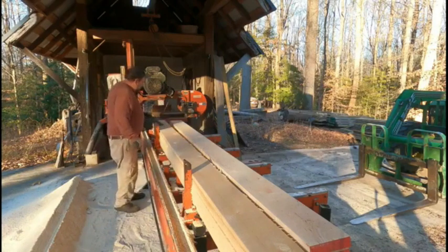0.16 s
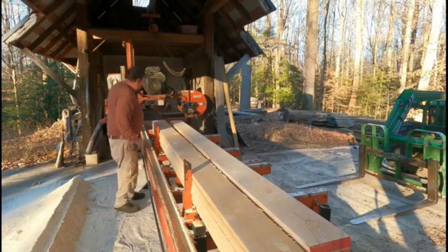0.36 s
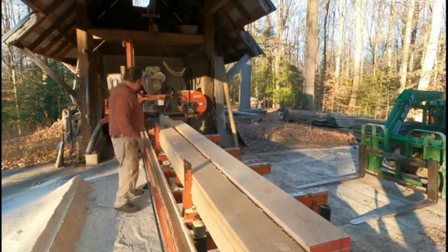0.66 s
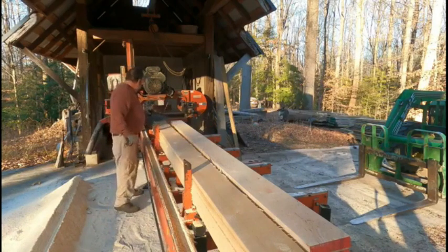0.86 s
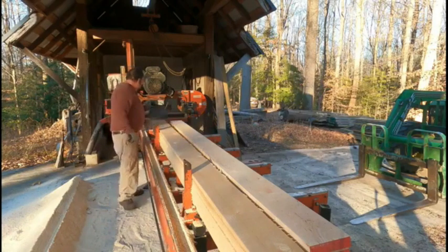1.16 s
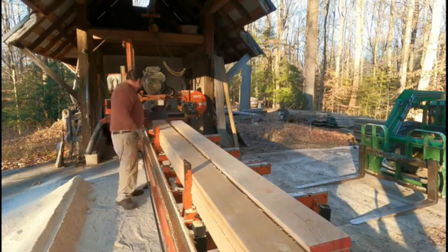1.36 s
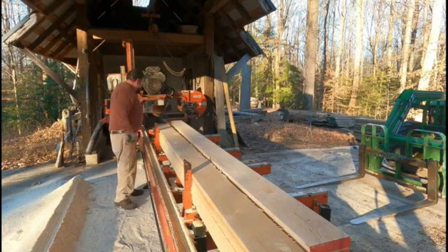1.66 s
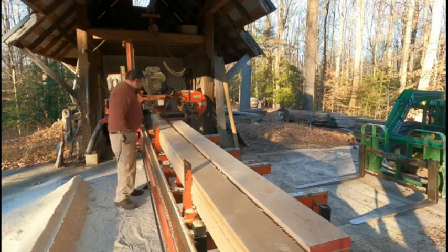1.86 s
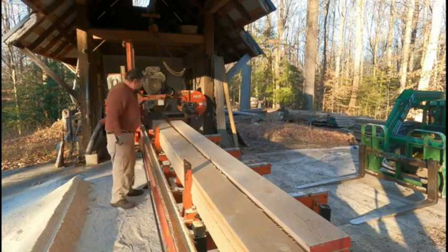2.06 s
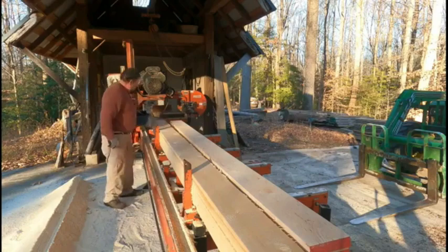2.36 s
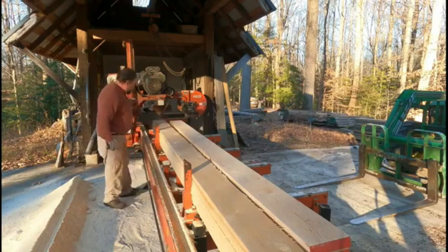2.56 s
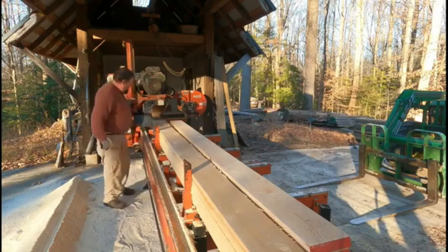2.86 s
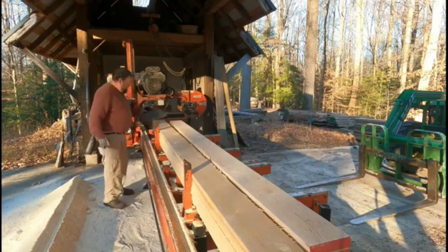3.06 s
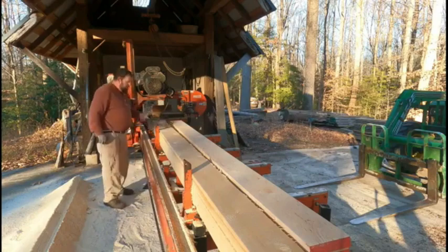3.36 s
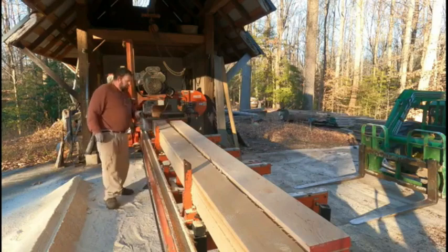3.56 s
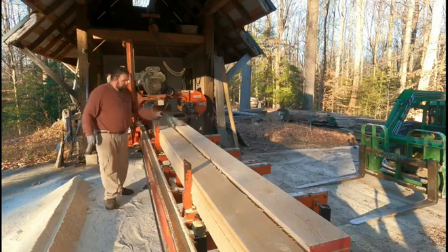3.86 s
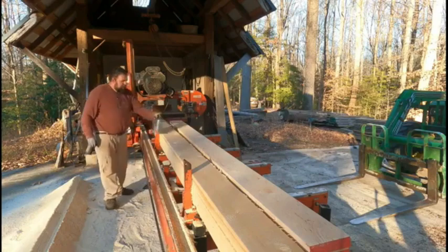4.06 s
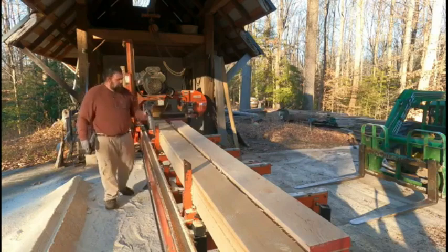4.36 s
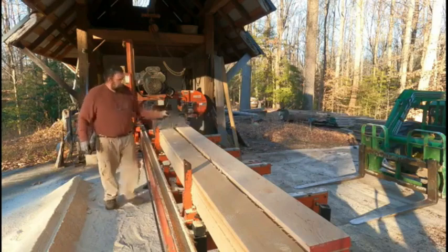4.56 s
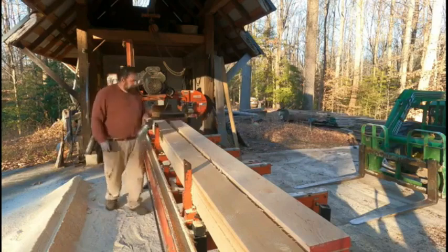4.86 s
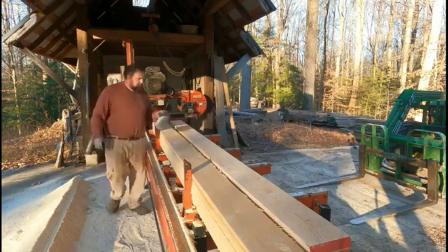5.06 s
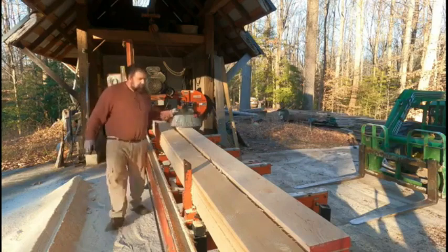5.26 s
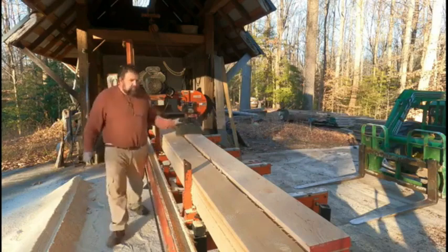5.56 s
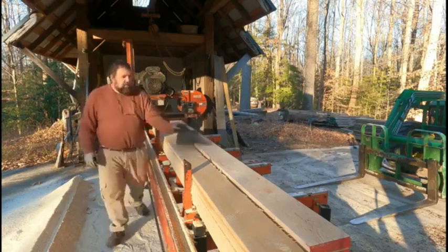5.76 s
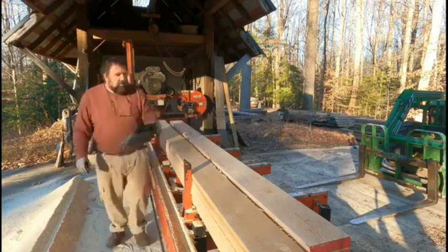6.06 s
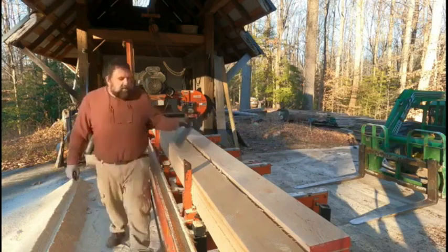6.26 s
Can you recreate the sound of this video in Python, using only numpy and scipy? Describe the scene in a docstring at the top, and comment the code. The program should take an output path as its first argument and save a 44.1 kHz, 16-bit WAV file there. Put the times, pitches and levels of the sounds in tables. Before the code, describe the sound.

A hand brush sweeps sawdust off a wooden board in short, scratchy strokes, with faint shoe scuffs over a low outdoor rumble.

```python
"""Over the low rumble of an open-air sawmill, a man hand-brushes sawdust off a freshly sawn board.
From 0.14 s, nine strokes: each slaps down, then the bristles hiss along the wood as it rings under them.
Meanwhile his shoes scuff in the sawdust and the mill shed answers faintly. From 4.5 s a few chips snap;
at 5.2 s the wood squeaks. The last, longest stroke lifts at 6 s, followed by a scuff and a snap."""
import sys
import numpy as np
from scipy import signal
from scipy.io import wavfile

SR = 44100
rng = np.random.default_rng(int(sys.argv[2]) if len(sys.argv) > 2 else 0)


def digitize_waveform(pressure):
    """Quantize a signal to 16-bit integers and store it at the path in sys.argv[1].

    Rows of a 2-D input are taken as channels; values are limited to [-1, 1].
    """
    field = np.atleast_2d(pressure).T
    bounded = np.clip(field, -1, 1)
    quanta = np.round(bounded * 32767).astype(np.int16)
    wavfile.write(sys.argv[1], SR, quanta)


N = 281799

# brush strokes: start/s, lift-off/s, hiss/dB, ring/dB, build-up exponent, release/(dB/s)
BRUSH_STROKES = [(.137, 0.337, -47.5, -49, 2.05, 333), (0.743, 1.033, -43.5, -43, 1.52, 284),
                 (1.594, 1.877, -48.5, -47.5, 1.22, 340), (2.226, 2.451, -47, -48.5, 1.7, 357),
                 (2.758, 2.957, -50.5, -49.5, 2.1, 239), (3.271, 3.549, -49, -47.5, 0.97, 334),
                 (3.962, 4.196, -45.5, -45.5, 0.93, 214), (4.757, 4.939, -45, -44.5, 1.08, 266),
                 (5.455, 5.993, -44.5, -49.5, 1.25, 430)]
# hand bears down: t/s, half length/s, rasp/dB, pitch factor, fizz/dB
HAND_PRESSES = [(1.807, 0.018, -46, 1.45, -74), (2.296, 0.049, -46.5, 1.08, -83),
                (3.469, 0.037, -40, 1.27, -76), (4.889, 0.036, -37, 0.98, -65),
                (5.937, 0.054, -44.5, 1.56, -53)]
# brush lands: t/s, ring/dB, knock/dB, crack/dB, crack f/Hz, tick/dB, t60/s
BRUSH_SLAPS = [(0.137, -44, -55.5, -44, 2100, -53, 0.32), (0.747, -50, -69, -56, 1940, -69, 0.27),
               (1.582, -31.5, -49, -41, 2190, -58, 0.22), (2.228, -37.5, -53.5, -38, 2080, -48.5, 0.13),
               (2.758, -42, -54, -44.5, 1880, -53, 0.28), (3.275, -39, -56, -39.5, 1480, -62, 0.18),
               (3.968, -45, -46, -43, 1360, -57, 0.25), (4.693, -40, -41.5, -39.5, 1660, -47, 0.21),
               (4.807, -35, -47, -39, 1530, -62, 0.38), (5.473, -44, -46.5, -48, 1590, -56.5, 0.21)]
# board bumps the mill bed: t/s, level/dB, t60/s
BOARD_THUDS = [(0.169, -49, 0.4), (1.637, -54.5, 0.36), (2.274, -52.5, 0.4), (4.175, -62, 0.42),
               (4.906, -50, 0.15), (5.571, -58.5, 0.19)]
# shoe drags: peak t/s, rise/s, fall/s, sole/dB, rustle/dB, grit/dB
SHOE_SCUFFS = [(.2, 0.041, 0.041, -62.5, -66, -76), (.68, .012, .04, -72, -78, -74),
               (1.331, 0.13, 0.07, -61, -50.5, -67), (2.29, 0.047, 0.059, -49.5, -48, -74),
               (3.335, 0.047, 0.034, -60, -63, -72), (3.55, 0.075, 0.14, -68, -70.5, -69),
               (4.19, 0.02, 0.099, -56, -60.5, -62), (4.63, 0.072, 0.084, -65.5, -63, -62),
               (4.83, 0.047, 0.16, -56, -76, -70), (5.06, 0.067, 0.11, -76.5, -68.5, -76),
               (5.33, 0.13, 0.12, -75, -82, -80), (5.97, 0.22, 0.076, -62, -56, -88),
               (6.135, 0.092, 0.091, -59.5, -60, -67)]
# chips break: t/s, level/dB, t60/s
CHIP_SNAPS = [(4.550, -71, .1), (4.625, -63, .1), (5.032, -56, .06), (6.108, -51, .03)]
# arm swings: t/s, level/dB, half length/s
ARM_SWISHES = [(0.117, -73.5, 0.1), (0.73, -78, 0.025), (1.56, -66.5, 0.13), (2.2, -68.5, 0.069),
               (2.76, -71, 0.027), (6.37, -73, 0.076)]
# rumble contour: t/s, level/dB
RUMBLE_CONTOUR = [(0, -65), (.25, -57.5), (.55, -63), (1.05, -60), (1.5, -64.5), (1.85, -57), (2.05, -68),
                  (2.35, -54), (2.9, -62), (3.6, -59), (3.8, -67.5), (4.45, -59.5), (5.4, -65), (5.6, -58),
                  (5.9, -63.5), (6.39, -64)]
# board resonances: f/Hz, bandwidth/Hz, gain/dB
BOARD_MODES = [(287, 18, -7.5), (347, 17, -6.5), (591, 21, -8), (673, 28, -9.5), (752, 9.3, -1),
               (1018, 46, 5), (1104, 21, 2), (1198, 50, 2.5), (1310, 56, 2), (1439, 65, 2.5),
               (1500, 33, 0.5), (1620, 86, 4), (1760, 40, -5), (1942, 43, -3), (2163, 33, -5.5),
               (2363, 41, -4), (2620, 32, 0.5), (2880, 107, -3.5)]
# landing crack spectrum: multiple of crack f, relative level/dB
CRACK_SHAPE = [(.4, -27), (.75, 0.5), (1., 6.5), (1.2, -1), (1.599, -4), (2.101, -15), (3.5, -43)]

# stroke spectra: f/Hz, relative level/dB
BRISTLE_HISS = [(700, -33), (1200, -12), (2500, -11.5), (3700, -0.5), (4700, 0), (5600, 2), (7000, 1),
                (8300, -6), (10500, -13), (12000, -14), (13000, -17), (15000, -30.5)]
TIP_FIZZ = [(3000, -20), (6000, -3), (9000, -1), (11500, 1), (13000, -3), (15000, -16)]
LIGHT_RUB = [(300, -36.5), (780, -13.5), (970, -1.5), (1500, 1.5), (2100, 4.5), (3300, 2), (4500, -7),
             (7000, -33.5)]
HARD_RUB = [(400, -28), (780, -10), (980, -1.5), (1250, -5), (1650, -7.5), (2100, 0.5), (3200, -16),
            (5000, -28)]
BASS_RUB = [(60, -5), (170, -8.5), (300, 5), (440, 0), (650, -2.5), (850, -4), (1050, -25), (1600, -49.5)]
# impact spectra: f/Hz, relative level/dB
SLAP_RING = [(400, -37), (800, -5), (980, 2.5), (1250, 5.5), (1500, -10.5), (2200, -46)]
SLAP_KNOCK = [(80, -18.5), (200, -16), (380, -9.5), (570, 5.5), (670, 6.5), (780, 1.5), (900, 6),
              (1300, -27), (3000, -45.5)]
SLAP_TICK = [(1500, -17.5), (3200, 0.5), (4700, -1.5), (6500, 3.5), (8500, -8.5), (12000, -21.5),
             (15000, -41)]
THUD_BODY = [(30, 10), (90, 1), (130, 7.5), (200, 2.5), (330, -11), (600, -30), (2000, -51)]
CHIP_CLICK = [(400, -13), (1400, 3.5), (3600, 6.5), (6500, 3.5), (9000, -13), (15000, -23)]
# friction and swish spectra: f/Hz, relative level/dB
SOLE_RUB = [(80, -12), (150, 7), (290, 9.5), (420, 1), (600, 4.5), (850, -3), (1500, -40.5)]
DUST_RUSTLE = [(400, -20.5), (800, -7), (1400, 4), (2000, 1.5), (2900, 1.5), (4500, -5.5), (7000, -15.5),
               (12000, -48.5)]
SQUEAK_GRAIN = [(700, -18), (1200, 8), (2200, -13), (3100, -12), (4000, -19), (9000, -63)]
SWISH_BAND = [(600, -29), (1050, -4.5), (1380, 3), (1900, -8.5), (3500, -12.5), (7000, -17.5),
              (12000, -46)]
# background spectra: f/Hz, relative level/dB
FAR_RUMBLE = [(15, -0.5), (35, 7.5), (70, 1.5), (120, -6.5), (200, -13), (500, -59)]
FAR_DRONE = [(70, -27.5), (120, -16), (150, -1), (180, 2), (220, -9), (290, -11.5), (400, -14),
             (600, -26.5), (1200, -50.5)]
AIR_HISS = [(200, -2), (600, 2.5), (900, 2), (1350, 3), (2200, -8), (4000, -12.5), (6000, -7), (7300, -11),
            (9500, -26.5), (15000, -31.5)]
# echo filter: f/Hz, gain/dB
YARD_TONE = [(100, -12.5), (500, 4.5), (1200, -2.5), (2600, 2.5), (5000, -3.5), (8000, -2), (13000, -1.5)]


def sweeping(rub_db=-25.5, crossover_db=-40.5):
    """Bristles flick over saw marks: their own hiss, the board ringing below."""
    hiss_gain, ring_gain = stroke_gains()
    hiss = unit(colour(flicks(per_s=30000, spread_db=.5), BRISTLE_HISS))
    light = unit(colour(board(flicks(per_s=7700, spread_db=1.5), direct_db=-2), LIGHT_RUB))
    hard = unit(colour(board(flicks(per_s=2600, spread_db=3), direct_db=-11), HARD_RUB))
    pressure = ring_gain ** 2 / (ring_gain ** 2 + amp(crossover_db) ** 2)  # harder push, hollower sound
    ring = np.sqrt(1 - pressure) * light + np.sqrt(pressure) * hard
    rub = unit(colour(board(flicks(per_s=2500, spread_db=3), direct_db=-3.5), BASS_RUB))
    grip_slip = amp(.5 * drift(per_s=72))
    return grip_slip * (hiss_gain * hiss + ring_gain * (ring + amp(rub_db) * rub))


def stroke_gains(lift_ease_s=.0062, ring_build=.83, dust_db=-30.5, dust_fall_db_per_s=64):
    """Hiss and ring grow with brush speed and die at lift-off; thrown dust trickles on."""
    t, hiss, ring = np.arange(N) / SR, np.zeros(N), np.zeros(N)
    for start_s, lift_s, hiss_db, ring_db, build, release_db_per_s in BRUSH_STROKES:
        speed = np.sin(np.pi / 2 * np.clip((t - start_s) / (lift_s - start_s), 0, 1))
        lifted_s = lift_ease_s * np.logaddexp(0, (t - lift_s) / lift_ease_s)
        contact = amp(-release_db_per_s * lifted_s)
        dust = amp(dust_db - dust_fall_db_per_s * lifted_s)
        hiss += amp(hiss_db) * speed ** build * np.hypot(contact, dust)
        ring += amp(ring_db) * speed ** (build * ring_build) * contact
    return hiss, ring


def board(contact, direct_db):
    """Contact noise, direct and through the board's modes."""
    out = amp(direct_db) * contact
    for hz, width_hz, db in BOARD_MODES:
        coupling = amp(2.5 * drift(per_s=14, count=len(contact)))  # brush crosses nodes and antinodes
        out += amp(db) * signal.lfilter(*signal.iirpeak(hz, hz / width_hz, SR), coupling * contact)
    return out


def presses(count=13230):
    """The bent tuft catches harder on the saw marks: short board rasp, fizz from the tips."""
    t, out = (np.arange(count) - count / 2) / SR, np.zeros(N)
    for at_s, half_s, rasp_db, pitch_factor, fizz_db in HAND_PRESSES:
        catches = flicks(per_s=3000, spread_db=1, count=count)
        rasp = colour(board(catches, direct_db=-6), np.array(HARD_RUB) * [pitch_factor, 1])
        fizz = colour(flicks(per_s=30000, spread_db=.5, count=count), TIP_FIZZ)
        swell = np.exp(-(t / half_s) ** 2)
        add(out, at_s + t[0], swell * (amp(rasp_db) * unit(rasp) + amp(fizz_db) * unit(fizz)))
    return out


def slaps(stagger_s=.003):
    """Longest bristles touch first; the whole tuft lands, rings the wood and splays."""
    out = np.zeros(N)
    for at_s, ring_db, knock_db, crack_db, crack_hz, tick_db, t60_s in BRUSH_SLAPS:
        hit = blow(t60_s, rise_s=.0018, bite=1.1, bite_s=.00099)
        touch = blow(.06, rise_s=.00079, bite=.2, bite_s=.003)
        crack_spectrum = np.array(CRACK_SHAPE) * [crack_hz, 1]
        add(out, at_s - stagger_s, at_level(colour(touch, SLAP_RING), ring_db - 17))
        add(out, at_s, at_level(colour(board(hit, direct_db=-7.5), SLAP_RING), ring_db))
        add(out, at_s, at_level(colour(board(hit, direct_db=-1), crack_spectrum), crack_db))
        add(out, at_s, at_level(colour(board(hit, direct_db=-3.5), SLAP_KNOCK), knock_db))
        splay = blow(t60_s, rise_s=.0065, bite=.59, bite_s=.015)
        add(out, at_s + stagger_s, at_level(colour(splay, SLAP_TICK), tick_db))
    return out


def squeak(at_s=5.245, length_s=.036, drive_db=-57.5, from_hz=1190, to_hz=2100, glide_s=.0163):
    """Uneven slips speed up and ring the board."""
    t, out = np.arange(0, length_s, 1 / SR), np.zeros(N)
    slip_hz = np.interp(t, [0, glide_s], [from_hz, to_hz])
    slip_hz *= 1 + .08 * drift(per_s=1500, count=len(t))
    grain = noise(SQUEAK_GRAIN, len(t))
    slips = unit(np.sin(2 * np.pi * np.cumsum(slip_hz) / SR) + .35 * grain)
    add(out, at_s, amp(drive_db) * np.sin(np.pi * t / length_s) * slips)
    return board(out, direct_db=-10)


def thuds():
    """The board bumps dully on the mill bed."""
    out = np.zeros(N)
    for at_s, db, t60_s in BOARD_THUDS:
        bump = blow(t60_s, rise_s=.0083, bite=.106, bite_s=.0091)
        add(out, at_s, at_level(colour(bump, THUD_BODY), db))
    return out


def shoes():
    """Soles drag through loose sawdust; a few chips snap."""
    t, out = np.arange(N) / SR, np.zeros(N)
    sole, rustle, grit = noise(SOLE_RUB), noise(DUST_RUSTLE), noise(BRISTLE_HISS)
    for peak_s, rise_s, fall_s, sole_db, rustle_db, grit_db in SHOE_SCUFFS:
        weight = np.exp(-((t - peak_s) / np.where(t < peak_s, rise_s, fall_s)) ** 2)
        out += weight * (amp(sole_db) * sole + amp(rustle_db) * rustle + amp(grit_db) * grit)
    out *= amp(1.4 * drift(per_s=160))  # dust yields in clumps
    for at_s, db, t60_s in CHIP_SNAPS:
        snap = blow(t60_s, rise_s=.0036, bite=2.3, bite_s=.0015)
        add(out, at_s, at_level(colour(snap, CHIP_CLICK), db))
    return out


def swishes():
    """The arm swings back in: faint swells of narrow noise."""
    t = np.arange(N) / SR
    gain = sum(amp(db) * np.exp(-((t - at_s) / half_s) ** 2) for at_s, db, half_s in ARM_SWISHES)
    return gain * noise(SWISH_BAND)


def yard(x, t60_s, treble_t60_s, echoes_per_s=3000, count=22050):
    """Scattered echoes off mill, shed and trees, independent per ear."""
    taps = rng.standard_normal((2, count)) * (rng.random((2, count)) < echoes_per_s / SR)
    hz, t, bands = signal.stft(taps, SR, nperseg=256)
    band_t60_s = np.interp(hz, [1000, 7000], [t60_s, treble_t60_s])[:, None]
    early = 6.7 * np.exp(-t / .01)  # mill bed and ground answer first
    response = signal.istft(bands * (amp(-60 * t / band_t60_s) + early), SR)[1]
    response /= np.linalg.norm(response, axis=1, keepdims=True)
    echoes = signal.fftconvolve(x[None], response, axes=1)[:, :N]
    return np.array([colour(ear, YARD_TONE) for ear in echoes])


def outdoors(swell_db=3, drone_db=-66, air_db=-75.5):
    """Lumpy rumble, far wavering drone, thin hiss of air."""
    rumble_db = np.interp(np.arange(N) / SR, *np.transpose(RUMBLE_CONTOUR))
    rumble = amp(rumble_db + swell_db * drift(per_s=9)) * stereo_noise(FAR_RUMBLE, side_db=-16)
    drone = amp(drone_db + 1.06 * drift(per_s=9.9)) * stereo_noise(FAR_DRONE, side_db=-7)
    air = amp(air_db + .9 * drift(per_s=2.61)) * stereo_noise(AIR_HISS, side_db=-3)
    return rumble + drone + air


def flicks(per_s, spread_db, count=N):
    """Random tiny impacts, a few larger; rms 1."""
    size = amp(spread_db * np.minimum(rng.exponential(1, count), 4))
    return unit(rng.standard_normal(count) * size * (rng.random(count) < per_s / SR))


def blow(t60_s, rise_s, bite, bite_s, count=22050):
    """Impact cluster: quick rise, hard first bite, rattle with t60 capped at 1/3 s."""
    t = np.arange(count) / SR
    attack = np.minimum(t / rise_s, 1) ** 2
    decay = amp(-60 * t / min(t60_s, 1 / 3)) + bite * np.exp(-t / bite_s)
    return flicks(per_s=9000, spread_db=.5, count=count) * attack * decay


def noise(spectrum, count=N):
    """Coloured noise, rms 1."""
    return unit(colour(rng.standard_normal(count), spectrum))


def stereo_noise(spectrum, side_db):
    """Mid/side coloured noise, rms 1."""
    mid, side = noise(spectrum), amp(side_db) * noise(spectrum)
    return unit(np.array([mid + side, mid - side]))


def drift(per_s, count=N):
    """Ramps between random values, rms about 1."""
    position = np.arange(count) * per_s / SR
    values = rng.standard_normal(int(position[-1]) + 2)
    return np.sqrt(3 / 2) * np.interp(position, np.arange(len(values)), values)


def colour(x, spectrum, size=4096):
    """Minimum-phase filter from (f/Hz, gain/dB) points."""
    hz, db = np.transpose(spectrum)
    bin_hz = abs(np.fft.fftfreq(size, 1 / SR)) + 1
    log_gain = np.log(amp(np.interp(np.log(bin_hz), np.log(hz), db)))
    taps = np.fft.ifft(np.exp(signal.hilbert(log_gain).conj())).real
    return signal.oaconvolve(x, taps[:size // 2])[:len(x)]


def at_level(hit, db):
    """Sets the rms of a hit's first 25 ms."""
    return amp(db) * hit / np.sqrt(np.mean(hit[:1100] ** 2))


def amp(db):
    """dB to gain."""
    return 10 ** (np.asarray(db) / 20)


def unit(x):
    """Scales to rms 1."""
    return x / np.sqrt(np.mean(x ** 2) + 1e-20)


def add(mix, at_s, sound):
    """Mixes a sound in at at_s."""
    part = mix[max(round(at_s * SR), 0):][:len(sound)]
    part += sound[:len(part)]


def scene(echo_db=-7.5):
    """Brush, board and shoes near centre, in the open yard."""
    work = sweeping() + presses() + slaps() + squeak() + swishes() + thuds() + shoes()
    echoes = amp(echo_db) * yard(work, t60_s=.55, treble_t60_s=.24)
    return work * amp([[-.7], [-.2]]) + echoes + outdoors()


def record(dry, cutoff_hz=15000):
    """Linear-phase low-pass."""
    taps = signal.firwin(511, cutoff_hz, window=("kaiser", 9), fs=SR)
    return signal.oaconvolve(dry, taps[None], "same")


dry = scene()
out = record(dry)
digitize_waveform(out)
```